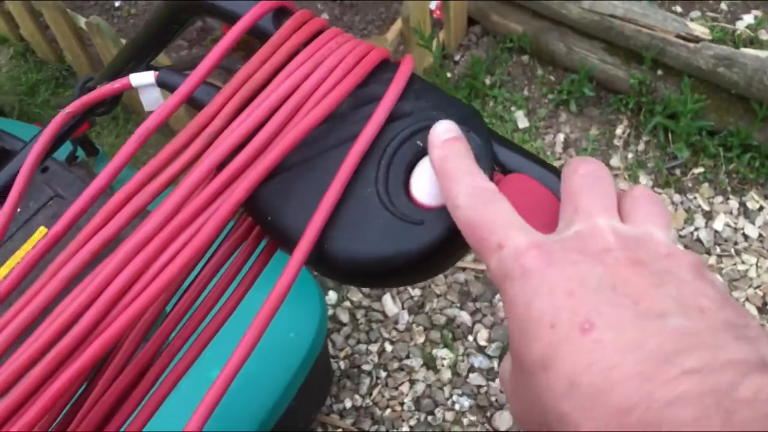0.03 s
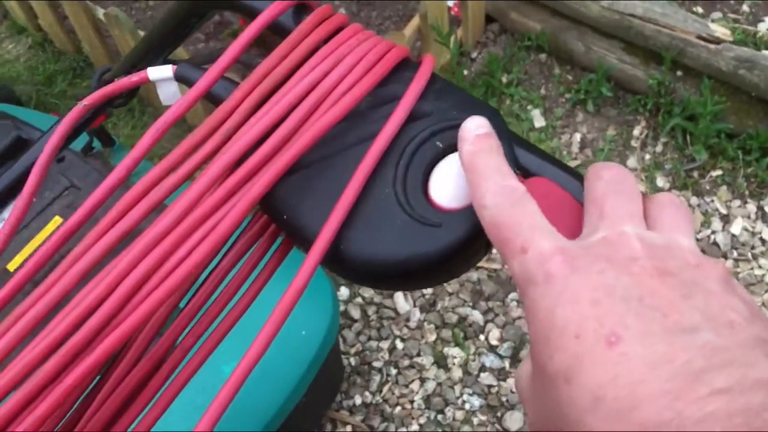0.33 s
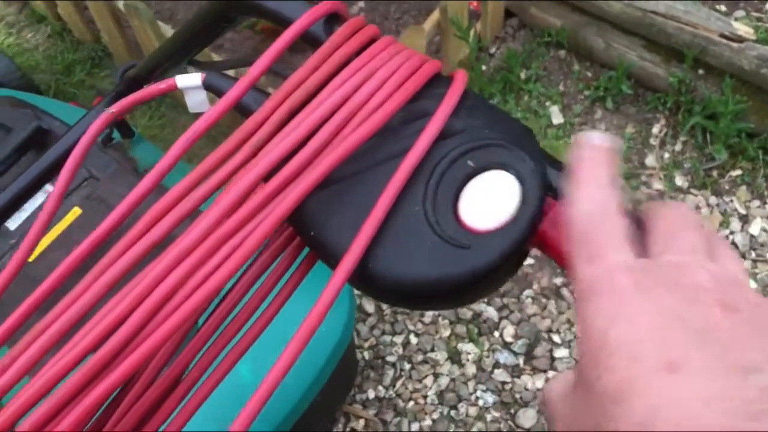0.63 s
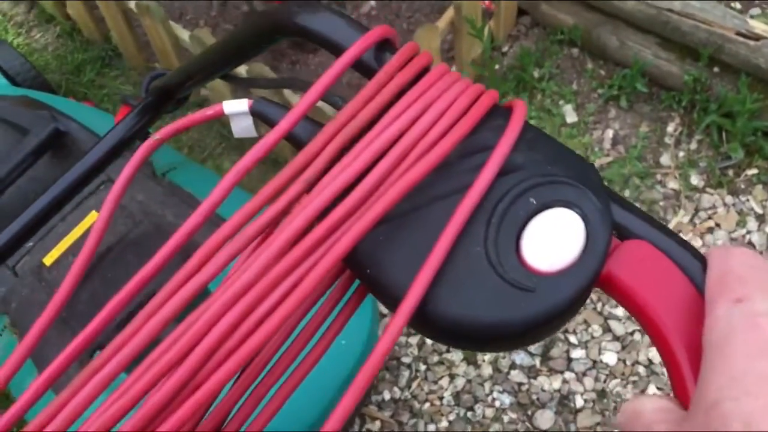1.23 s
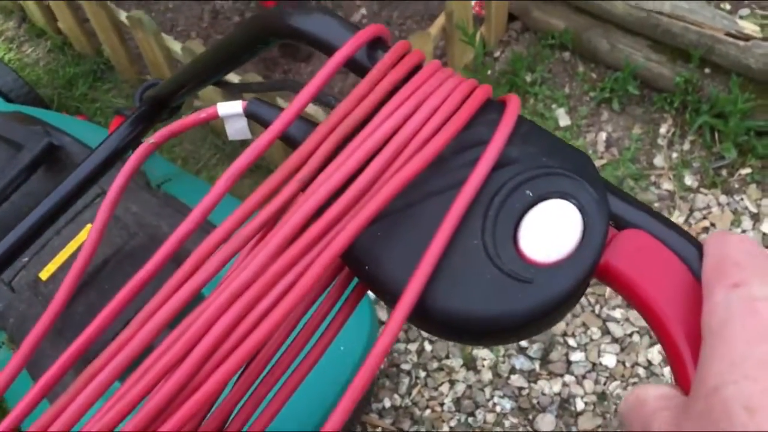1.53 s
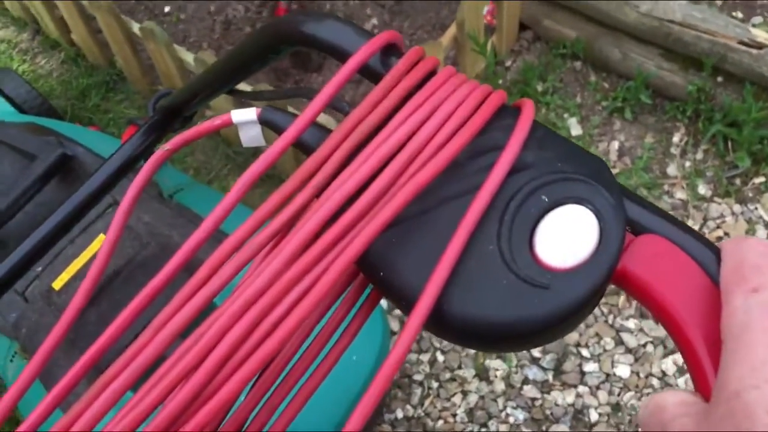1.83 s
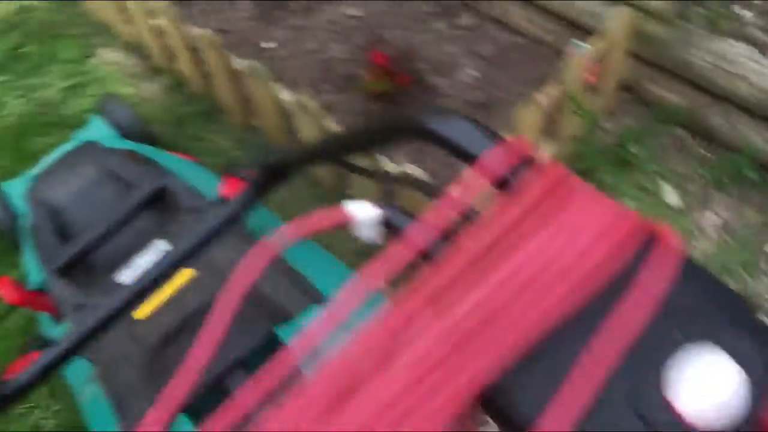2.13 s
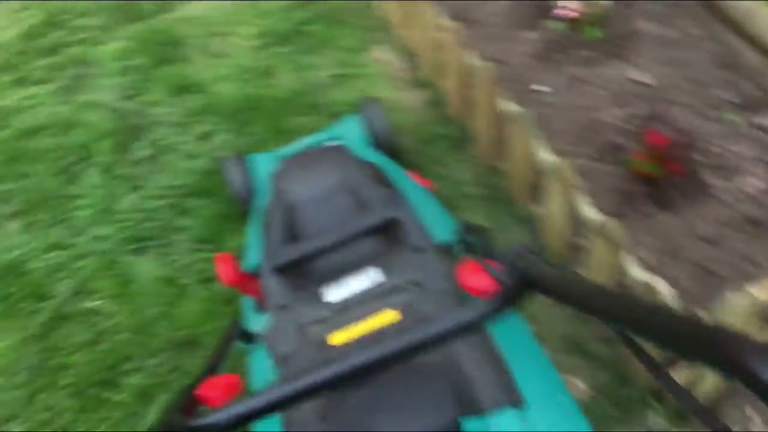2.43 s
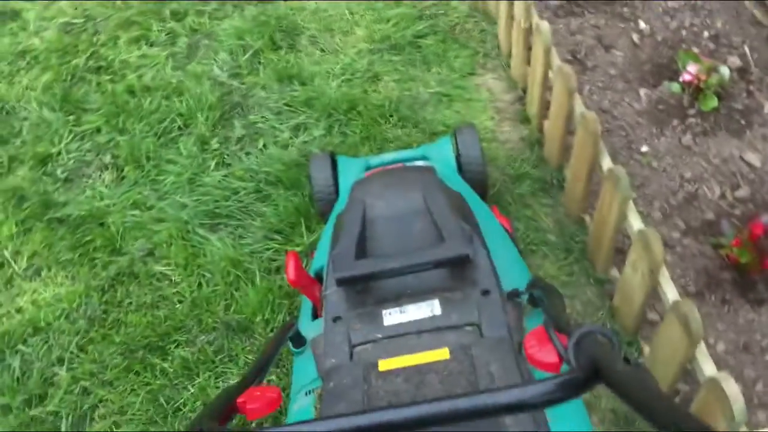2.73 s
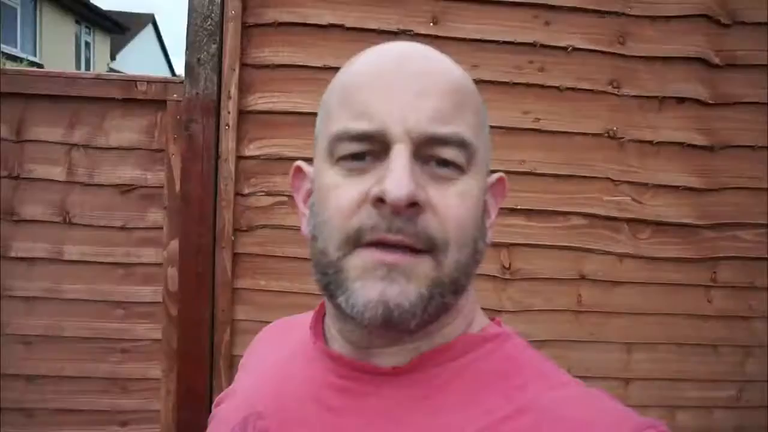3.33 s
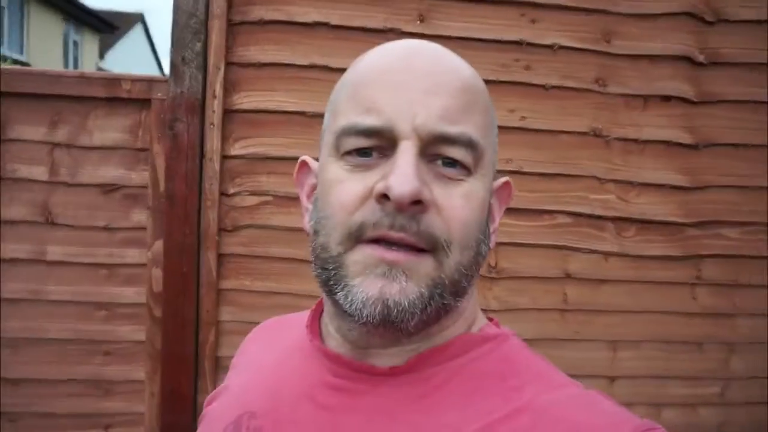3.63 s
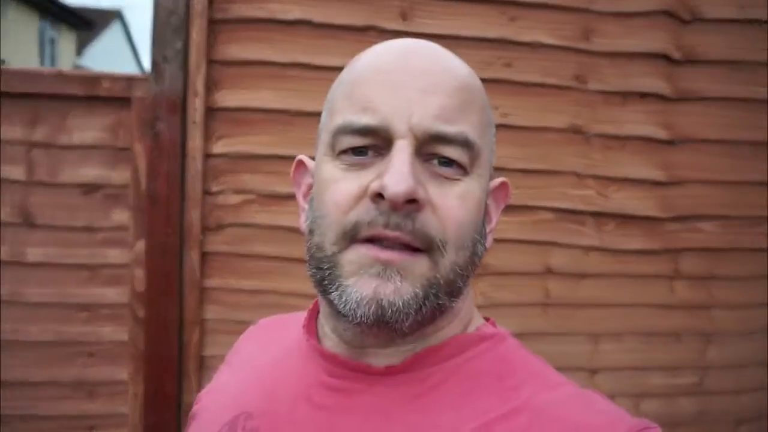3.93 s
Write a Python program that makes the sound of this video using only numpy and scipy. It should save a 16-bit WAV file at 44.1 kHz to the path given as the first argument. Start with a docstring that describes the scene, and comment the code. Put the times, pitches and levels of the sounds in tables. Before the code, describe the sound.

An electric lawnmower spins up to a loud, steady drone in a garden, heard close from its handle. A few plastic clicks and rubs come early on. The drone cuts off abruptly, leaving faint outdoor air.

```python
"""An electric rotary lawnmower spins up in a garden, heard from its handle and then from over its deck.
Periodic suction pulses from the two-ended blade make a harmonic drone, and turbulence adds a rush.
A belt couples the blade to a much faster motor, which hums, whines and briefly squeals; the housing
buzzes in forced vibration. Friction and impact at the plastic handle give rubs, clicks and knocks,
and two puffs of air rumble. All this cuts off abruptly, and quiet outdoor air fades in."""
import sys
import numpy as np
from scipy import signal
from scipy.fft import rfft, irfft, next_fast_len
from scipy.io import wavfile
from scipy.ndimage import uniform_filter1d, map_coordinates

SR = 44100
rng = np.random.default_rng(int(sys.argv[2]) if len(sys.argv) > 2 else 0)


def generate_wav(sig):
    """Save sig (samples, or channels by samples) to the path in sys.argv[1] as 16-bit PCM at SR."""
    pcm = np.round(np.clip(np.atleast_2d(sig).T, -1, 1) * 32767).astype(np.int16)
    wavfile.write(sys.argv[1], SR, pcm)


N = 176400

# Each row: time in seconds, blade speed in turns per second.
BLADE_SPEED = [(0, 39.5), (0.06, 43.03), (0.12, 46.02), (0.2, 48.81), (0.3, 51.37), (0.42, 53.39),
               (0.55, 54.79), (0.7, 55.49), (0.85, 56.52), (1, 57.25), (1.2, 57.91), (1.45, 58.33),
               (1.8, 58.5), (2.2, 58.75), (2.6, 58.81), (3.0, 58.88), (3.3, 59.0)]
# Tones at full speed. Each row: harmonic of that part's turn rate, dB at the handle, dB over the deck.
BLADE_TONES = [(2, -21.5, -21.5), (3, -49, -43.5), (4, -27.5, -30), (5, -48, -46), (6, -29, -30.5),
               (7, -35.5, -44.5), (8, -23, -30), (9, -37, -41), (10, -36, -32.5), (11, -38, -41.5),
               (12, -26.5, -30), (13, -44, -50), (14, -39, -51), (16, -35.5, -32), (20, -47, -41.5),
               (24, -41, -41), (26, -40, -41.5), (28, -39, -36.5), (30, -45, -43), (34, -49, -48.5)]
MOTOR_HUM = [(1, -21.5, -21), (2, -47.5, -48), (3, -48.5, -53), (4, -59, -47), (5, -54.5, -52.5),
             (11, -57, -52)]
ARMATURE_WHINE = [(12, -48, -56), (23, -61, -57), (24, -58, -54), (26, -64, -53), (27, -50, -50)]
# Each row: blade harmonic, gain in dB for a tenfold speed.
BLADE_GROWTH = [(2, 42), (4, 35), (6, -0.5), (8, 63.5), (10, 5), (12, 22), (14, 20), (16, 70), (34, 60)]
# Air resonances of the deck. Each row: blade harmonic, centre in Hz, width in Hz, gain in dB.
DECK_RESONANCES = [(4, 218, 20, 7), (4, 197, 12, -6), (6, 325, 18, 8), (10, 542, 28, 14),
                   (10, 566, 14, -12)]
# Housing vibration. Each row: frequency in Hz, level per spectral line in dB.
BUZZ_ENVELOPE = [(850, -56), (1300, -51.5), (1700, -51.5), (2300, -57), (2900, -60.5), (3750, -56.5),
                 (4400, -61), (5200, -60), (7000, -63.5), (9300, -66), (10500, -70.5)]
# Each row: time in seconds, frequency in Hz, level in dB.
BRUSH_SQUEAL = [(0, 8800, -53), (.06, 8920, -43), (.12, 9100, -40), (.17, 8900, -54), (.24, 9150, -46),
                (.33, 9300, -45), (.45, 9347, -42), (.6, 9400, -90)]
# Noise spectra. Each row: frequency in Hz, relative spectral density in dB.
CHURN_SPECTRUM = [(20, -14.5), (35, -7.5), (55, -2.5), (85, -2.5), (150, -9), (210, -5.5), (290, -1),
                  (380, -3), (500, -6), (680, -7.5), (850, -8.5), (1200, -11), (1600, -10), (2100, -20),
                  (2800, -25), (5000, -51)]
HISS_SPECTRUM = [(800, -41.5), (2000, 6), (2800, 1), (3800, 3), (5000, -1.5), (7000, -1), (8700, -3.5),
                 (9500, -1.5), (10400, -8), (12000, -5), (15800, -11.5)]
RUB_SPECTRUM = [(1500, -26.5), (3000, -4), (4200, 4.5), (5300, -11.5), (7500, -7.5), (8500, 3), (9200, 0.5),
                (10200, -12), (13000, -15), (15800, -11.5)]
SCRAPE_SPECTRUM = [(100, -12), (400, 5), (900, -2.5), (1600, 0), (2300, -4.5), (3200, -2), (5000, -9.5),
                   (6500, -12), (9000, -3.5), (10500, -19), (15800, -15.5)]
PUFF_SPECTRUM = [(20, -13.5), (45, -3), (65, 1), (100, -9.5), (250, -40.5)]
GARDEN_SPECTRUM = [(20, -11), (45, -2), (100, -4.5), (160, -8), (250, -5), (450, -8), (700, -8.5),
                   (1200, -10), (1700, -17.5), (2400, -27), (4000, -37.5), (7000, -45), (15500, -47.5)]
# Swells of noise. Each row: start in seconds, length in seconds, level in dB.
HAND_RUBS = [(-.1, 0.54, -33.5), (.08, 0.065, -39), (.40, .075, -30.5), (.45, 0.44, -36.5), (.62, .14, -43),
             (.835, .03, -37.5), (1.195, 0.048, -33)]
LEVER_SCRAPES = [(.628, 0.05, -23), (.668, .065, -29.5)]
AIR_PUFFS = [(.66, .09, -22), (.92, 0.11, -29)]
# Each row: start in seconds, level in dB, relative level of the ring in dB.
HANDLE_CLICKS = [(.3581, -24, -25), (.4723, -7, -20), (.4933, -17, -25), (1.2141, -20, -18),
                 (1.2241, -15, -10), (1.2645, -24, -25)]
# Each row: start in seconds, level in dB.
LEVER_KNOCKS = [(.641, -19), (.652, -16.5), (.659, -23), (0.684, -27.5)]
# Normal modes. Each row: frequency in Hz, relative level in dB, 60 dB decay time in seconds.
HANDLE_MODES = [(3790, 3, 0.023), (5220, -4.5, 0.022), (6070, 1, 0.024), (9000, -2, .02), (11150, -3, .02)]
LEVER_HOUSING_MODES = [(380, -3, .035), (890, -5, .03), (1220, -1.5, .03), (1580, -3, .05), (3230, -8, .02)]
# Each row: time in seconds, level of the outdoor air in dB.
GARDEN_FADE = [(3.39, -77), (3.48, -81), (3.53, -64), (3.57, -54.5), (3.64, -50), (4, -49)]

MOTOR_RATIO, BELT_RATIO = 5.2855, 1.45  # cycles per blade turn
MOTOR_GROWTH_DB, CHURN_GROWTH_DB = 152, -3  # for a tenfold speed
CHURN_DB, HISS_DB, HISS_OVER_DECK_DB, WAVER_DB = -25, -36, 1, 0.69
MOVE_START_S, MOVE_END_S, CUT_S = 2.12, 2.52, 3.364


def mower():
    """Mechanical coupling: one rotation drives blade, motor, housing and air."""
    speed = uniform_filter1d(curve(BLADE_SPEED), size=2000, mode="nearest")
    angle = 2 * np.pi * np.cumsum(speed * (1 + .0005 * wobble(20))) / SR
    over_deck = np.clip((clock() - MOVE_START_S) / (MOVE_END_S - MOVE_START_S), 0, 1)  # 0 at the handle
    return sum(source(angle, speed, over_deck) for source in (blade, motor, buzz, turbulence))


def blade(angle, speed, over_deck):
    """Fourier series: suction pulses, two a turn, make a drone of mainly even harmonics."""
    out = np.zeros(N)
    for k, handle_db, above_db in BLADE_TONES:
        db = handle_db + (above_db - handle_db) * over_deck + WAVER_DB * wobble(7.89)
        db += deck_db(k, speed) - deck_db(k, speed[-1])
        db += np.interp(k, *np.transpose(BLADE_GROWTH)) * np.log10(speed / speed[-1])
        phase = 0.96 * max(1, k / 12) * rng.standard_normal()  # high harmonics fall further out of step
        out -= amp(db) * np.cos(k * angle + phase)
    return np.sqrt(2) * out


def deck_db(harmonic, speed):
    """Cavity resonance: a blade tone swells or dips as it sweeps through the deck's response."""
    return sum(db / (1 + (2 * (harmonic * speed - centre_hz) / width_hz) ** 2)
               for k, centre_hz, width_hz, db in DECK_RESONANCES if k == harmonic)


def motor(angle, speed, over_deck):
    """Rotating unbalance hums and the armature whines; the blade's load modulates both via the belt."""
    shaft_angle = MOTOR_RATIO * angle + .006 * wobble(30)
    out = np.zeros(N)
    for k, handle_db, above_db in MOTOR_HUM + ARMATURE_WHINE:
        db = handle_db + (above_db - handle_db) * over_deck + WAVER_DB * wobble(7.03)
        out += amp(db) * np.cos(k * shaft_angle + rng.uniform(0, 2 * np.pi))
    load = 1 + 0.073 * (np.cos(angle) + np.cos(4 * angle))
    return np.sqrt(2) * out * load * amp(MOTOR_GROWTH_DB * np.log10(speed / speed[-1]))


def buzz(angle, speed, over_deck, scatter_db=3.5, size=4096):
    """Forced vibration: shaken once a turn, the housing radiates a line spectrum uneven by direction."""
    hz = np.arange(size // 2 + 1) * speed[-1]
    in_band = (hz > BUZZ_ENVELOPE[0][0]) & (hz < BUZZ_ENVELOPE[-1][0])
    lines = in_band * amp(spectrum_db(BUZZ_ENVELOPE, hz) + scatter_db * rng.standard_normal((2, len(hz))))
    cycles = irfft(lines * np.exp(2j * np.pi * rng.random(lines.shape))) * size / np.sqrt(2)
    turn_fraction = angle / (2 * np.pi) % 1
    behind, above = (np.interp(turn_fraction, np.arange(size) / size, cycle) for cycle in cycles)
    return behind * np.sqrt(1 - over_deck) + above * np.sqrt(over_deck)


def turbulence(angle, speed, over_deck):
    """Turbulent noise pulses as the blade ends pass the deck's walls; the hiss also beats with the belt."""
    slaps = (np.cos(4 * angle) + np.cos(8 * angle) + np.cos(12 * angle)) / np.sqrt(3)
    churn_pulse = 1 + .2 * np.cos(2 * angle) + .3 * slaps
    hiss_pulse = 1 + .18 * np.cos(2 * angle) + .16 * np.cos(BELT_RATIO * angle)
    churn = noise(CHURN_SPECTRUM) * unit(churn_pulse * amp(.9 * wobble(40)))
    hiss = noise(HISS_SPECTRUM) * unit(hiss_pulse * amp(0.72 * wobble(60)))
    churn *= amp(CHURN_DB + CHURN_GROWTH_DB * np.log10(speed / speed[-1]))
    hiss *= amp(HISS_DB + HISS_OVER_DECK_DB * over_deck)
    return churn + hiss


def squeal(spread_hz=170):
    """Friction at the motor's brushes excites a thin, unsteady tone that rises and dies away."""
    times, hz, db = np.transpose(BRUSH_SQUEAL)
    pitch = np.interp(clock(), times, hz) + spread_hz * wobble(700)
    level = amp(np.interp(clock(), times, db) + 2.6 * wobble(90))
    return np.sqrt(2) * level * np.sin(2 * np.pi * np.cumsum(pitch) / SR)


def rubbing():
    """Sliding friction: the hand rubs the handle, and the lever scrapes as it is gripped."""
    rubs = swells(HAND_RUBS, RUB_SPECTRUM, grain_db=3.5)
    return rubs + swells(LEVER_SCRAPES, SCRAPE_SPECTRUM, grain_db=1.5)


def clicks(snap_t60_s=.016, highpass_hz=5200):
    """Impulse response: each bright snap comes with a short ring of the plastic handle."""
    out, t = np.zeros(N), np.arange(SR // 10) / SR
    highpass = signal.butter(2, highpass_hz, "high", fs=SR, output="sos")
    for start, db, ring_db in HANDLE_CLICKS:
        snap = signal.sosfilt(highpass, rng.standard_normal(len(t))) * amp(-60 * t / snap_t60_s)
        ring = amp(ring_db) * ringing(HANDLE_MODES, t)
        out[round(start * SR):][:len(t)] += amp(db) * (snap / 2 + ring)
    return out


def knocks():
    """Impacts of the lever excite the normal modes of its hollow housing."""
    return sum(amp(db) * ringing(LEVER_HOUSING_MODES, np.maximum(clock() - start, 0))
               for start, db in LEVER_KNOCKS)


def puffs():
    """Pressure fluctuations in puffs of air at the listener make a low rumble."""
    return swells(AIR_PUFFS, PUFF_SPECTRUM, grain_db=-3.5)


def garden(tick_s=3.645, tick_hz=4500, tick_db=-58, tick_t60_s=.018):
    """Ambient noise of outdoor air fades in, with one damped mode as a faint tick."""
    tick = ringing([(tick_hz, tick_db, tick_t60_s)], np.maximum(clock() - tick_s, 0))
    return noise(GARDEN_SPECTRUM) * amp(curve(GARDEN_FADE)) + tick


def swells(rows, spectrum, grain_db):
    """Amplitude modulation: grainy noise under half-sine envelopes."""
    envelope = sum(amp(db) * np.sin(np.pi * np.clip((clock() - start) / length, 0, 1))
                   for start, length, db in rows)
    return envelope * unit(noise(spectrum) * amp(grain_db * wobble(500)))


def ringing(modes, t):
    """Free vibration: each mode decays exponentially."""
    return sum(amp(db - 60 * t / t60) * np.sin(2 * np.pi * hz * t) for hz, db, t60 in modes)


def noise(spectrum):
    """Spectral shaping of white noise, at rms 1."""
    return unit(filtered(rng.standard_normal(N), lambda hz: amp(spectrum_db(spectrum, hz))))


def filtered(x, response):
    """Linear filtering: the spectrum of x times a frequency response."""
    size = next_fast_len(N + 8192)
    return irfft(rfft(x, size) * response(np.fft.rfftfreq(size, 1 / SR)), size)[:N]


def spectrum_db(rows, hz):
    """Interpolation of levels on a logarithmic frequency axis."""
    row_hz, db = np.transpose(rows)
    return np.interp(np.log(hz + 1), np.log(row_hz + 1), db)


def wobble(rate):
    """Smooth random fluctuation, with rate knots a second."""
    return map_coordinates(rng.standard_normal(int(N * rate / SR) + 4), [clock() * rate])


def curve(rows):
    """Linear interpolation of timed values to every sample."""
    return np.interp(clock(), *np.transpose(rows))


def clock():
    """Sample times in seconds."""
    return np.arange(N) / SR


def amp(db):
    """Decibels to amplitude."""
    return 10 ** (np.asarray(db) / 20)


def unit(x):
    """Normalisation to rms 1."""
    return x / np.sqrt(np.mean(x ** 2) + 1e-20)


def scene():
    """Superposition: mower, handle and puffs sound until the cut, then the quiet garden."""
    handle = rubbing() + clicks() + knocks()
    gate = np.clip((CUT_S - clock()) / 0.0019, 0, 1)
    return (gate * (mower() + squeal() + handle + puffs()) + garden())[None]


def record(dry, cutoff_hz=15850):
    """Band limiting: a steep low-pass removes the highest treble."""
    return filtered(dry[0], lambda hz: 1 / (1 + (hz / cutoff_hz) ** 200))[None]


dry = scene()
out = record(dry)
generate_wav(out)
```